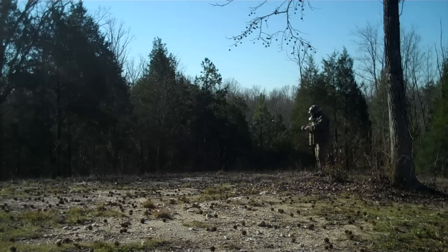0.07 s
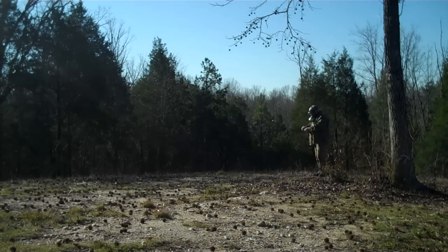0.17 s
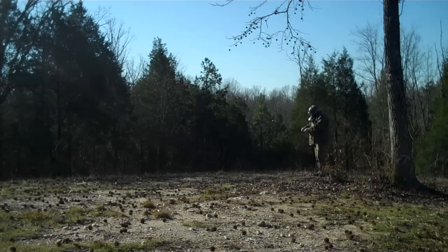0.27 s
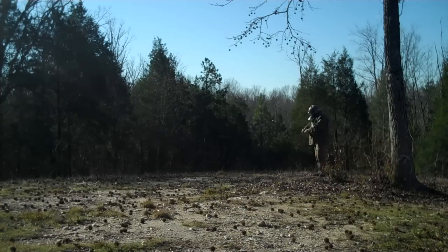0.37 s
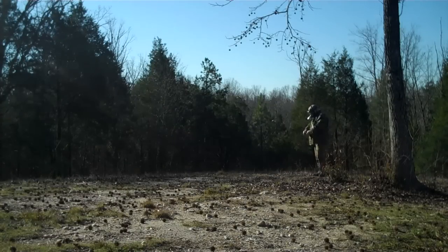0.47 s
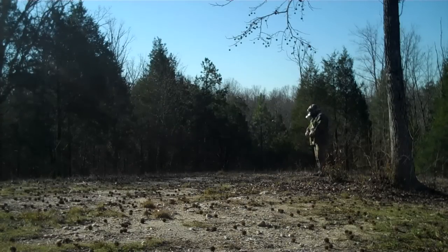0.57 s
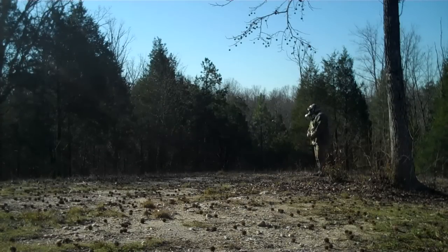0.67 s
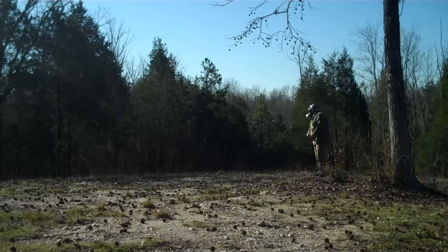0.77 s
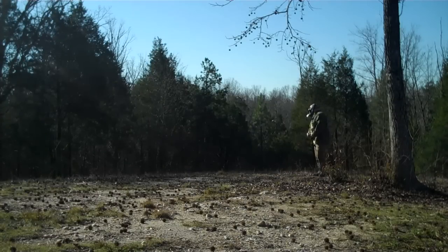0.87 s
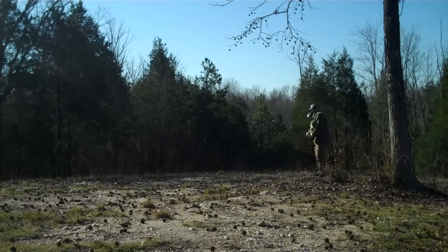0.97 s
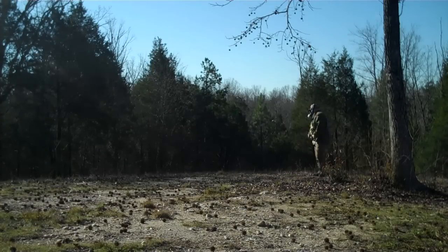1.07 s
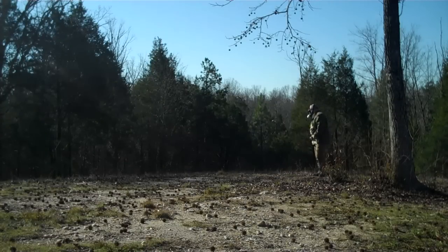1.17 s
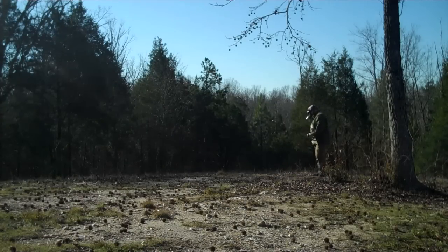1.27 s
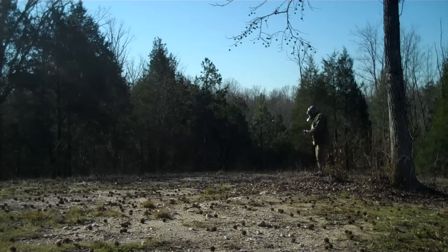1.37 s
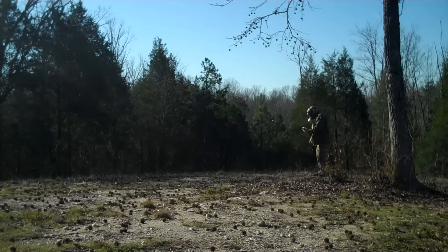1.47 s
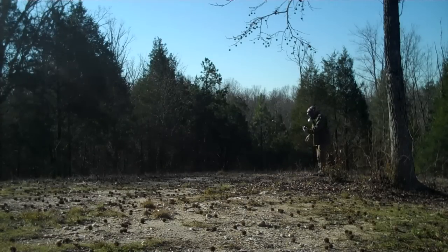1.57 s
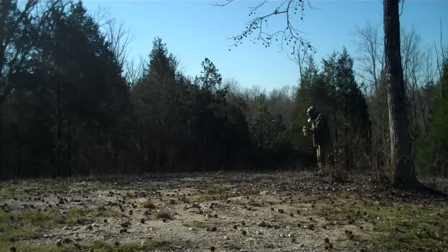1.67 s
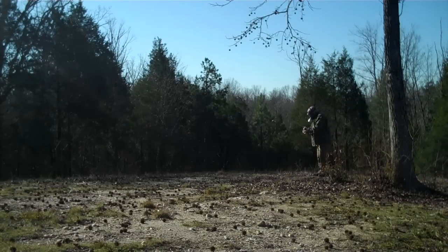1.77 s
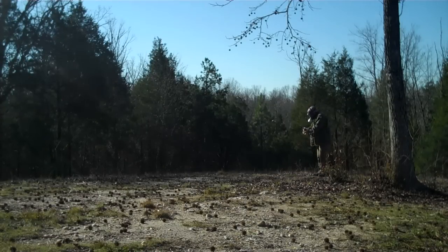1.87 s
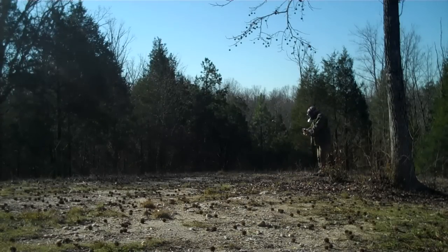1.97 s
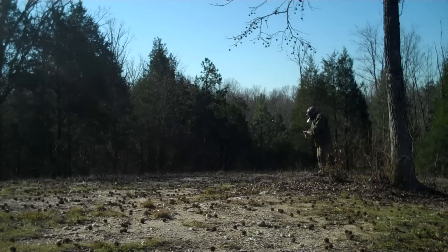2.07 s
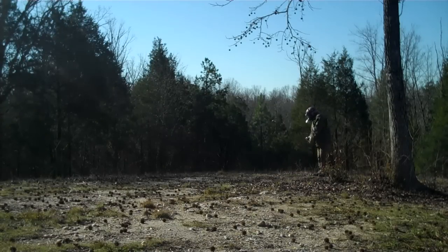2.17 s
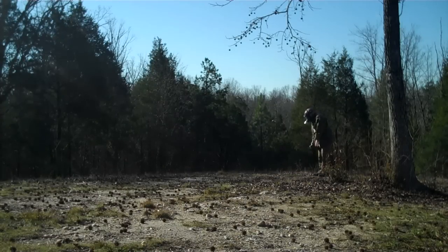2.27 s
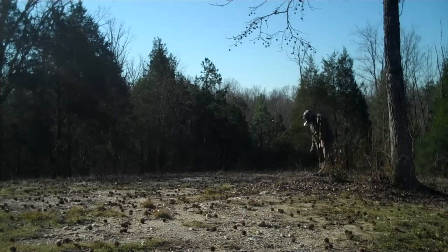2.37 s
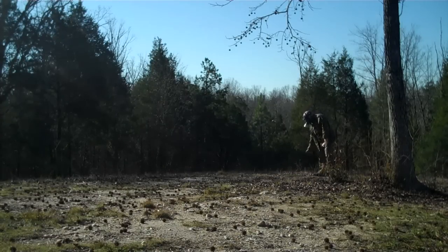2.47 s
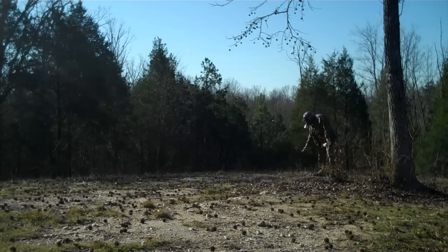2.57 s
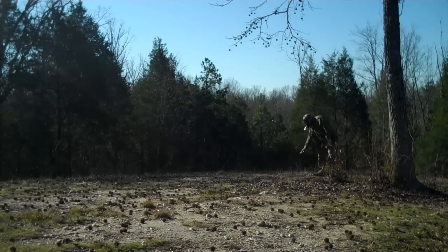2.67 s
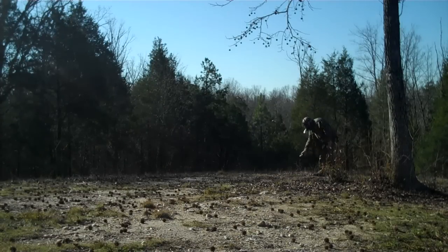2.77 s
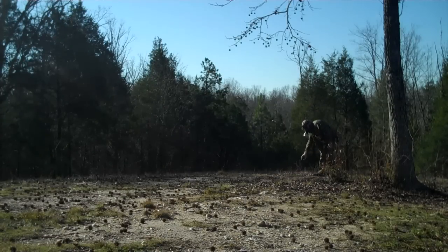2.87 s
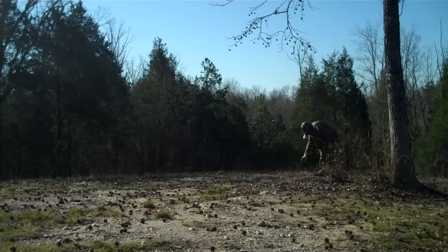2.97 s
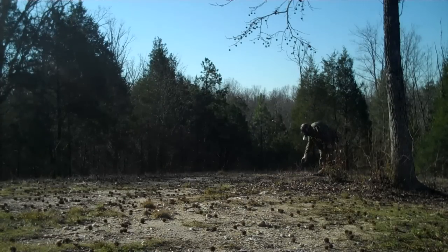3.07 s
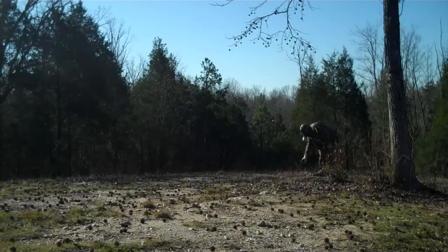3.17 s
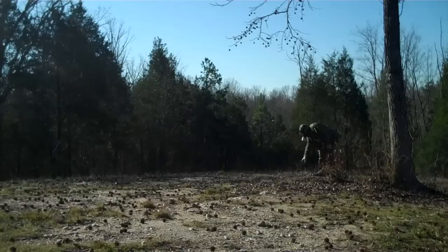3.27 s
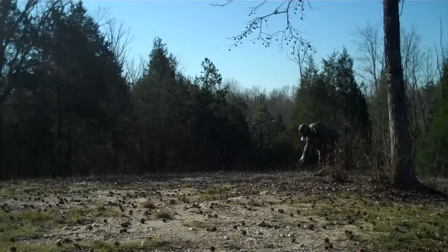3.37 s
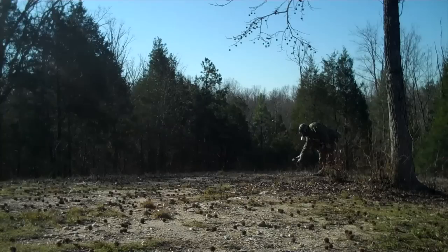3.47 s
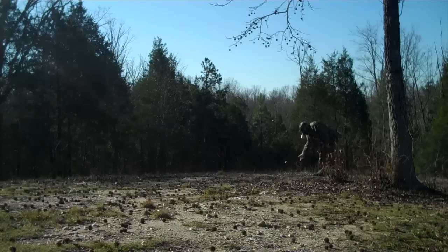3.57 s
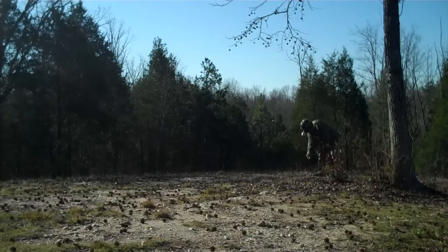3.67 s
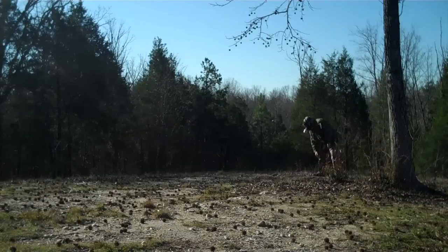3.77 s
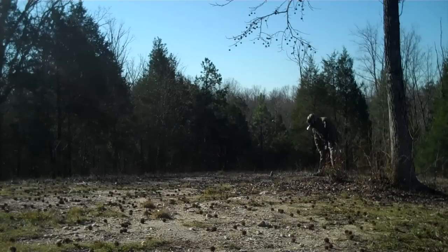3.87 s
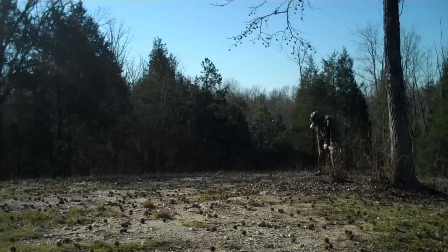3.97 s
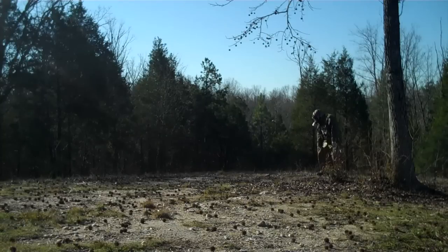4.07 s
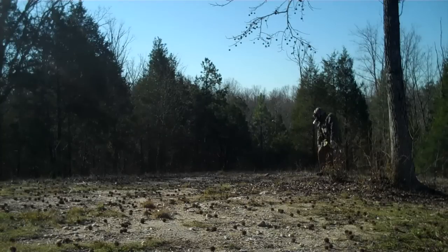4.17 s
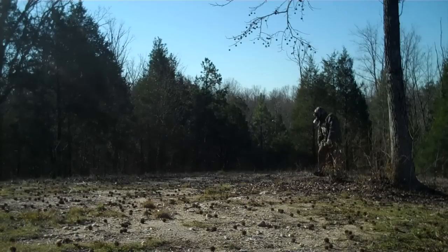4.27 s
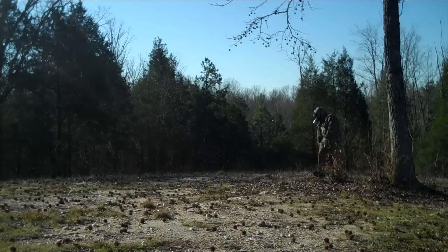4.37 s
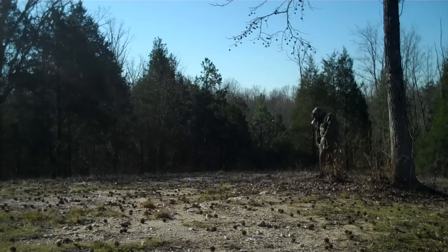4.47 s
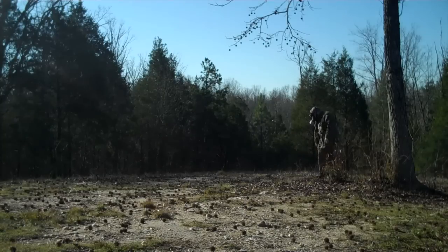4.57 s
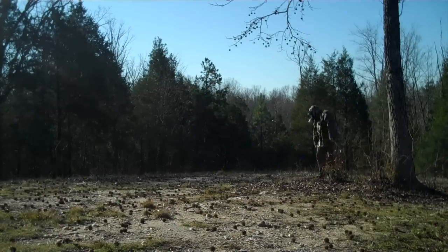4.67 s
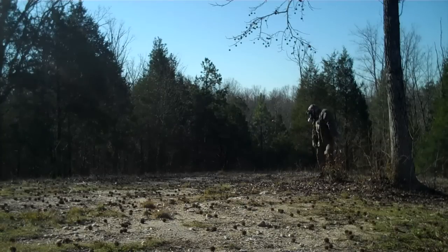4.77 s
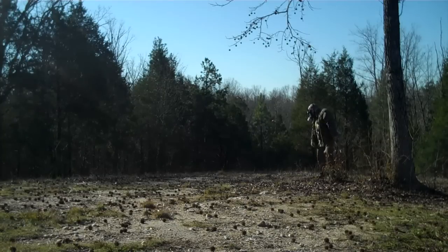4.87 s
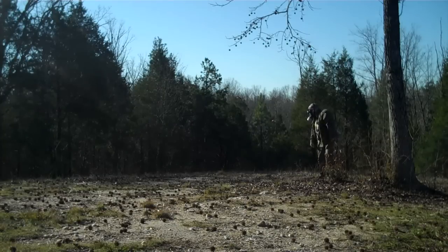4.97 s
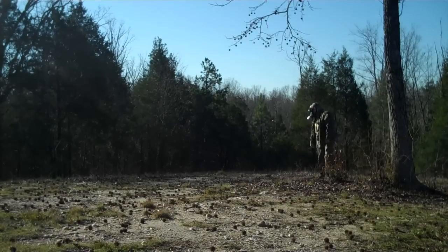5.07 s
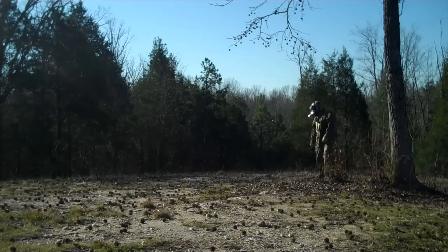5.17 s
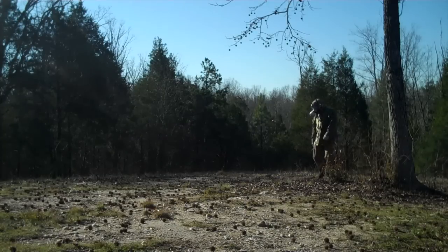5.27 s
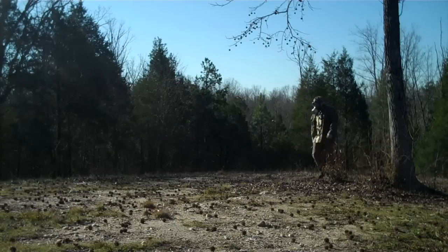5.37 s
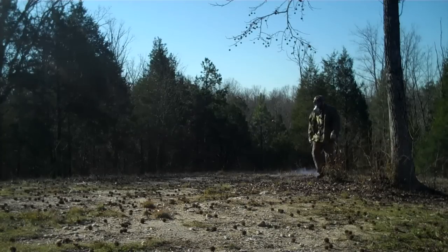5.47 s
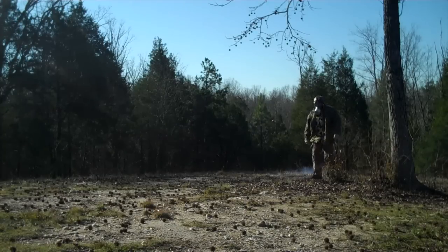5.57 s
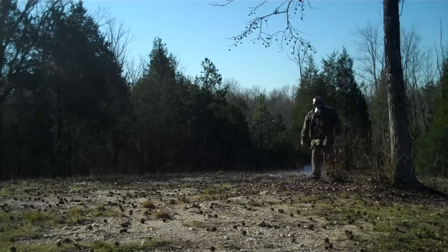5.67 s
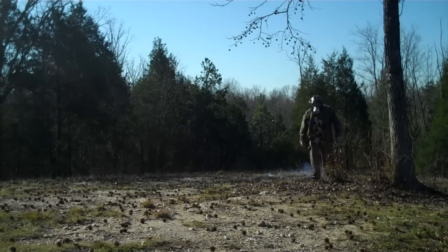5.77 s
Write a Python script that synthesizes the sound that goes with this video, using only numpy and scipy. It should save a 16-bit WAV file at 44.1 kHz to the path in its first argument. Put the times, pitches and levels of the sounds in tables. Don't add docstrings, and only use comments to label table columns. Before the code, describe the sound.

In a quiet woodland clearing, gear rustles and small metal parts click, then a fuze pops violently and echoes off the trees over hissing smoke.

```python
import sys
import numpy as np
from scipy import signal
from scipy.fft import rfft, irfft, next_fast_len
from scipy.io import wavfile
from scipy.ndimage import uniform_filter1d

SR = 44100
rng = np.random.default_rng(int(sys.argv[2]) if len(sys.argv) > 2 else 0)


def inscribe(sig):
    pcm = np.round(np.clip(np.atleast_2d(sig).T, -1, 1) * 32767)
    wavfile.write(sys.argv[1], SR, pcm.astype(np.int16))


def gain_from_db(level_db):
    decades = np.asarray(level_db, float) / 20
    return 10 ** decades


N = 256662
POP_S = 5.6043
TOP_HZ = 14300

# freq_hz, level_db (per Hz)
SCATTER_COLOUR = [(88, -47), (150, -23.5), (635, -13), (1090, -7.5), (1970, -2), (3010, -6), (4020, -7.5),
                  (4430, -7.5), (5910, -1.5), (7730, -6.5), (10500, -32.5), (14000, -40), (14900, -37)]


def unit(x):
    return x / np.sqrt(np.mean(x ** 2) + 1e-20)


def along(points, hz):
    f, v = np.transpose(points)
    return np.interp(np.log(hz + 1), np.log(f + 1), v)


def curves(rows, outside=-120):
    s, *cols = np.transpose(rows)
    return [np.interp(np.arange(N) / SR, s, c, outside, outside) for c in cols]


def filtered(x, response):
    n = x.shape[-1]
    m = next_fast_len(n + 4096)
    return irfft(rfft(x, m) * response(np.fft.rfftfreq(m, 1 / SR)), m)[..., :n]


def modes(table):
    def response(f):
        total = 0
        for k, (centre, width, db) in enumerate(table):
            total = total + (-1) ** k * gain_from_db(db) * 1j * f * width / (centre ** 2 - f * f + 1j * f * width)
        return total
    return response


def lean(points):
    return lambda f: gain_from_db(along(points, f) * np.array([[.5], [-.5]]))


def noise(spectrum, alike, size=N):
    def colour(hz):
        turn = np.arccos(np.clip(along(alike, hz), -1, 1)) / 2
        return gain_from_db(along(spectrum, hz)) * [np.cos(turn), np.sin(turn)]
    mid, side = filtered(rng.standard_normal((2, size)), colour)
    return np.array([mid + side, mid - side]) / np.sqrt(np.mean(mid ** 2) + 1e-20)


def add(track, s, sound, pan_db=0):
    part = track[:, round(s * SR):][:, :sound.shape[-1]]
    part += (sound * gain_from_db([[pan_db / 2], [-pan_db / 2]]))[:, :part.shape[1]]


def pop():
    # freq_hz, level_db (per Hz)
    blast_colour = [(180, -14), (300, -5.5), (911, -6.5), (1600, 2), (2310, -4), (2770, -20), (3530, -8),
                    (4090, -30), (7370, -11), (10200, -35), (12600, -21.5), (14900, -58)]
    # freq_hz, t60_s
    ground_decay = [(150, 0.19), (600, 0.26), (1500, 0.12), (3000, 0.091), (6500, 0.089), (12000, 0.084)]
    # pitch_hz, level_db, t60_s
    barks = [(1560, 4, .018), (1940, 0, .024)]
    close = [(300, 0.92), (2000, 0.9), (7000, 0.81), (14000, 0.29)]  # freq_hz, left-right likeness
    out, t = np.zeros((2, N)), np.arange(SR // 5) / SR

    add(out, POP_S - .0035, gain_from_db(-21 - 60 * t / 0.011) * noise(blast_colour, close, size=len(t)))

    u = t / 0.00021
    add(out, POP_S, gain_from_db(11.0) * (u * (2 - u) * np.exp(-u))[None])

    add(out, POP_S + .0004, gain_from_db(3 - 60 * t / 0.015) * noise(blast_colour, close, size=len(t)))

    hz, when, z = signal.stft(noise(SCATTER_COLOUR, close, size=len(t)), SR, nperseg=128)
    dying = z * gain_from_db(-60 * when / along(ground_decay, hz)[:, None])
    tail = signal.istft(dying, SR, nperseg=128)[1][:, :len(t)]
    add(out, POP_S + .001, gain_from_db(-5.5) * tail)

    for hz, db, t60 in barks:
        add(out, POP_S + .0001, gain_from_db(db - 60 * t / t60)[None] * np.sin(2 * np.pi * hz * t))

    thump = -t / 0.00082 * np.exp(1 - t / 0.00077)
    add(out, POP_S + .0003, gain_from_db(-.5) * thump * [[.12], [1]])
    return out


def rush():
    # time_s, low_db, high_db
    wash_levels = [
        (5.664, -25, -28.5),
        (5.704, -22.5, -28),
        (5.714, -25, -29),
        (5.746, -21.5, -28.5),
        (5.82, -26.5, -34.5),
    ]
    # freq_hz, level_db (per Hz)
    wash_colour = [(24, -65), (40, -35), (71, -48), (113, -25), (232, -11), (345, -14.5), (400, -8.5),
                   (560, -7.5), (820, -12), (2210, -4), (3050, -8), (3600, -13), (7430, -11.5),
                   (10800, -38), (13800, -39), (14900, -79)]
    # freq_hz, left-right likeness
    wash_alike = [(60, 0.3), (130, 0.96), (290, 0.99), (630, 0.96), (1380, 0.7), (3010, 0.27),
                  (6590, -0.28), (14400, -0.24)]
    # time_s, peak_db, left_right_db
    trunk_echoes = [(5.662, -16, 2), (5.666, -16, 1), (5.678, -13, 0), (5.683, -13, 4), (5.69, -18, 2),
                    (5.699, -12.5, 2), (5.703, -15, 2), (5.708, -14, 3), (5.713, -18, 0), (5.723, -13, -2),
                    (5.733, -16, 1.5), (5.746, -13, 3), (5.751, -15, 0), (5.757, -16, 0), (5.768, -19, 0),
                    (5.775, -18, 0), (5.783, -15.5, -2), (5.796, -20, 0), (5.81, -20, 0)]
    first_echo_s = 5.6622
    onset = [(first_echo_s, -60, -60), (first_echo_s + 0.00086, *wash_levels[0][1:])]
    hold = [(wash_levels[-1][0] + .1, *wash_levels[-1][1:])]
    low_db, high_db = curves(onset + list(wash_levels) + hold)
    wash = noise(wash_colour, wash_alike)
    low = filtered(wash, lambda f: 1 / (1 + (f / 3500) ** 4))

    trunks, t = np.zeros((2, N)), np.arange(SR // 20) / SR
    for s, db, pan in trunk_echoes:
        add(trunks, s, gain_from_db(db + 15 - 60 * t / 0.022)[None] * (1 - np.exp(-t / 0.00078)), pan)
    sound = (0.7 + .6 * trunks) * (gain_from_db(low_db) * unit(low) + gain_from_db(high_db) * unit(wash - low))

    middle = filtered(wash, lambda f: abs(modes([(1800, 2200, 0)])(f)) ** 2)
    sound = sound + trunks * gain_from_db(low_db - 3) * unit(middle)

    top = filtered(sound, lambda f: 1 / (1 + (9500 / (f + 1)) ** 12))
    sound = sound - top * np.clip((np.arange(N) / SR - first_echo_s) / .2, 0, 1)

    t = t[:256]
    slap = gain_from_db(-11.5 - 60 * t / 0.005) * (1 - np.exp(-t / 0.00027))
    add(sound, first_echo_s, slap * noise(SCATTER_COLOUR, [(1000, .9)], size=256))
    return sound


def clicks():
    # freq_hz, width_hz, level_db
    port = [(4330, 1100, -12.5), (5790, 890, 0.5), (7330, 1400, -2.5), (11500, 4900, -18)]
    # time_s, peak_db, body_hz, body_db, t60_s
    snaps = [(1.1055, -28, 3300, -8, 0.022), (1.1107, -28, 3570, -9, 0.017),
             (1.7548, -32, 3200, -5.5, 0.0087), (1.7572, -21, 2800, -10, 0.0058),
             (2.4534, -61, 1470, 6, 0.01), (2.7507, -25.5, 3850, -35, 0.01),
             (2.7883, -32.5, 1460, -29, 0.0087), (3.5912, -32.5, 3700, -9, 0.014),
             (3.6099, -26, 3470, -14, 0.031), (3.616, -16, 3850, -14, 0.0066),
             (3.6186, -12, 3450, -18, 0.0076), (3.773, -40.5, 3800, 1, 0.01),
             (3.8886, -26, 1290, -22, 0.0087), (3.89, -16.5, 4140, -42, 0.012),
             (4.464, -47.5, 2540, 9.5, 0.01), (4.5145, -33, 3630, 1, 0.013), (4.62, -52, 2200, 6, .015),
             (4.633, -51, 2320, 2, 0.01), (4.641, -53, 2200, 6, .01), (4.676, -52, 2200, 6.5, .012)]
    # time_s, peak_db
    small_ticks = [(1.858, -45.5), (2.712, -39.5), (2.721, -42), (2.7258, -40), (2.7383, -42),
                   (2.7484, -41), (2.7858, -40), (2.7986, -44), (2.8163, -46), (2.9266, -54), (2.947, -50),
                   (2.9614, -47), (3.0084, -50), (3.8087, -42), (3.8617, -35), (3.873, -38), (3.9687, -40),
                   (4.0775, -45), (4.1573, -46), (4.203, -42.5), (4.5837, -45), (4.6099, -50),
                   (5.0728, -42), (5.1355, -42), (5.1735, -48), (5.1997, -53), (5.577, -34)]
    tick_hz, tick_spread, tick_body_db, tick_t60_s = 3210, 0.294, -14.5, 0.015
    out, t = np.zeros((2, N)), np.arange(2048) / SR
    ticks = [(s, db, tick_hz * np.exp(tick_spread * rng.normal()), tick_body_db, tick_t60_s)
             for s, db in small_ticks]
    for s, db, hz, body_db, t60 in list(snaps) + ticks:
        draw = rng.standard_normal((3, len(t)))
        rattle = draw[0] + 0.35 * draw[1:]
        rattle = rattle * (gain_from_db(-60 * t / 0.0017) + 0.49 * gain_from_db(-60 * t / t60))
        rattle[:, 0] = 2.3
        bright = filtered(rattle, lambda f: modes(port)(f) ** 2)
        body = filtered(rattle, lambda f: modes([(hz, .23 * hz, 0)])(f) ** 2)
        broad = filtered(draw[1:] * gain_from_db(-60 * t / 0.0053), lambda f: modes([(6200, 6000, 0)])(f) ** 3)
        click = bright / abs(bright).max()
        click = click + gain_from_db(-9.0) * broad / abs(broad).max()
        click = click + gain_from_db(body_db) * body / abs(body).max()
        add(out, s - .0004, gain_from_db(db) * click)
    return out


def rings():
    # pitch_hz, level_db, t60_s
    pull_ring = [(3500, -10, 0.048), (3820, -4, .025), (5580, 1, .034), (6320, 8, 0.03), (6630, -13, .04),
                 (7160, -14, .06)]
    # pitch_hz, level_db, t60_s
    lever = [(3560, -7, .09), (5066, -10, .09), (5276, -2, .1), (5303, -2, .16), (5652, -12, .1),
             (5970, -5, .15), (5787, -20, .3), (6352, -17, .08), (8032, -8, .1), (9825, -12, .06),
             (11500, -22, .04), (13850, -15, .06)]
    # pitch_hz, level_db, t60_s
    fuze_body = [(682, -6, 0.042), (954, 1.5, .05), (1330, 5, 0.039), (1606, 4, 0.046), (1956, -15, 0.057),
                 (3890, -7.5, 0.098), (5660, -1, 0.085), (7200, 4, 0.058)]
    # start_s, pitch_hz,
    # level_db, t60_s
    single_notes = [(1.0, 410, -62, 1), (1.105, 500, -53.5, 0.18), (3.616, 575, -49, 0.46),
                    (3.89, 564, -58, 0.42), (1.168, 3450, -59, .12), (1.19, 3630, -63, .1),
                    (1.205, 3380, -65, .12), (1.26, 3410, -66, .1), (3.616, 710, -35, 0.014),
                    (1.757, 2050, -39, 0.019), (3.62, 410, -62, 0.42), (3.895, 478, -52.5, 0.5),
                    (3.894, 188, -45, 0.041), (1.111, 2200, -45, .008), (4.205, 7500, -52, .05),
                    (5.1, 6150, -54, .04), (1.486, 600, -54, 0.019), (1.503, 870, -48, .03),
                    (1.508, 440, -49, .03), (4.464, 1500, -35, 0.0056), (4.513, 1200, -49, 0.017),
                    (4.605, 685, -54, 0.074), (5.566, 1040, -47, .01), (5.577, 880, -44, 0.033),
                    (5.589, 6250, -43, 0.031)]
    # start_s,
    # pitch_hz, level_db, t60_s
    pings = [(1.1048, 3670, -21, .008), (1.105, 4770, -27, .008), (1.1103, 3700, -26, .01),
             (1.1105, 5720, -29, .02), (1.1105, 6300, -25, .015), (1.169, 5900, -54, .015),
             (1.174, 7300, -52, .015), (1.205, 720, -64, .25), (1.27, 760, -64, .25),
             (1.7567, 6200, -10, .0055), (3.591, 5750, -35, .02), (3.6156, 5600, -7, .005),
             (3.6156, 4540, -22, .006), (3.6184, 5600, -7, .007), (3.6184, 4500, -23, .008),
             (3.6184, 7200, -24, .006), (3.66, 5300, -40, .12), (3.6265, 5975, -31, .07),
             (3.682, 5950, -50, .08), (3.705, 5650, -52, .1), (3.733, 5700, -53, .1),
             (3.889, 5600, -24, .035), (3.889, 6300, -24, .01), (3.889, 7350, -27, .03),
             (3.903, 510, -52, .06), (3.955, 5800, -47, .05), (4.027, 6000, -48, .03),
             (4.055, 7600, -53, .03)]
    out, t = np.zeros((2, N)), np.arange(SR // 2) / SR

    def strike(s, ring_db, part):
        for hz, level_db, t60 in part:
            phase = rng.uniform(0, 2 * np.pi) + rng.normal(0, 0.53, (2, 1))
            jangle_db = 1.8 * np.interp(t * 150, np.arange(80), rng.standard_normal(80))
            envelope = gain_from_db(ring_db + level_db + jangle_db - 60 * t / t60) * (1 - np.exp(-t / 0.00037))
            add(out, s, envelope * np.sin(2 * np.pi * hz * t + phase))

    strike(1.111, -40.5, pull_ring)
    strike(3.617, -28, lever)
    strike(3.89, -51, lever)
    strike(5.606, -13, fuze_body)
    for s, hz, db, t60 in single_notes:
        add(out, s, gain_from_db(db - 60 * t / t60) * np.sin(2 * np.pi * hz * t)[None])
    for s, hz, db, t60 in pings:
        rise = (1 - np.exp(-t * hz / 1.3)) ** 2
        add(out, s, gain_from_db(db - 60 * t / t60)[None] * rise * np.sin(2 * np.pi * hz * t))
    return out


def scrape():
    # start_s, length_s, level_db
    strokes = [
        (1.165, .06, -70),
        (1.2, .1, -74),
        (1.28, .03, -77),
    ]
    # freq_hz, level_db (per Hz)
    drag_colour = [(2500, -40), (3050, -8), (3450, 0), (3800, -6), (4300, -40)]
    t = np.arange(N) / SR
    stroke = np.zeros(N)
    for s, length, db in strokes:
        stroke += gain_from_db(db) * np.clip(np.minimum(t - s, s + length - t) / .008, 0, 1)
    knots = np.arange(N // 120 + 2)
    grit = gain_from_db(4 * np.interp(np.arange(N) / 120, knots, rng.standard_normal(len(knots))))
    return stroke * unit(grit) * noise(drag_colour, [(3000, .8)])


def rustle():
    # peak_s, gear_db, leaves_db, rise_s, fall_s
    moves = [(1.125, -61, -68, .005, 0.065), (1.175, -60.5, -61.5, .03, 0.17),
             (1.505, -67, -63.5, .06, 0.079), (2.3, -71.5, -73, 0.17, .4), (2.46, -67, -62, .05, 0.035),
             (2.746, -47.5, -64, 0.052, .025), (2.786, -54, -72, .006, 0.13), (3.01, -62, -69, 0.3, 0.19),
             (3.622, -44, -60, .004, 0.039), (3.51, -62.5, -75, .1, 0.096), (3.585, -59, -62, 0.085, 0.057),
             (3.69, -61, -63.5, .1, 0.17), (3.812, -53, -60, .012, .08), (3.865, -47, -54.5, .2, 0.15),
             (3.892, -40.5, -50, .012, 0.051), (3.958, -53.5, -63.5, .06, 0.39), (4.3, -64, -72, .9, 1),
             (4.466, -55, -58, 0.016, 0.068), (4.516, -48, -56, 0.091, 0.038), (4.604, -53, -56, 0.1, 0.24),
             (4.8, -64.5, -71, .4, 0.69), (5.085, -59, -64, 0.083, .25),
             (5.194, -52.5, -59.5, 0.057, 0.086), (5.3, -64, -69.5, 0.71, 0.56),
             (5.582, -55, -63, 0.032, .1)]
    # freq_hz, level_db (per Hz)
    gear_colour = [(2500, -30), (3600, -15.5), (4800, -10), (5900, -1), (6650, -5.5), (7400, -3),
                   (8500, -17), (9700, -27), (14000, -36)]
    # freq_hz, level_db (per Hz)
    leaves_colour = [(200, -25), (500, 0), (1000, -1.5), (1600, -3.5), (2150, 1), (3200, -1.5), (4500, -11),
                     (6000, -32)]
    swell_db = 20
    t, level_db = np.arange(N) / SR, np.full((2, N), -120.)
    for s, gear_db, leaves_db, rise, fall in moves:
        slope_db = swell_db * np.where(t < s, (s - t) / rise, (t - s) / fall)
        level_db = np.maximum(level_db, np.array([[gear_db], [leaves_db]]) - slope_db)
    gear, leaves = uniform_filter1d(gain_from_db(level_db), size=300)

    clumps = []
    for knots in rng.standard_normal((2, N // 100 + 2)):
        fast = np.interp(np.arange(N) / 100, np.arange(len(knots)), knots)
        slow = np.interp(np.arange(N) / 700, np.arange(len(knots)), knots[::-1])
        clumps.append(unit(gain_from_db(3.16 * fast + 2.0 * slow)))
    gear_clumps, leaf_clumps = clumps

    alike = [(600, 1.0), (7000, 0.75), (14000, .2)]  # freq_hz, left-right likeness
    kit = noise(gear_colour, alike)
    lower_band = filtered(kit, lambda f: 1 / (1 + (f / 6600) ** 16))
    kit = gear_clumps * lower_band + gear_clumps[::-1] * (kit - lower_band)
    return gear * kit + leaves * leaf_clumps * noise(leaves_colour, alike)


def woods(x):
    t = np.arange(SR // 3) / SR
    echo = rng.standard_normal((2, len(t))) * gain_from_db(-60 * t / 0.55) * np.clip((t - .058) / 0.032, 0, 1)
    near = rng.standard_normal((2, len(t))) * gain_from_db(-60 * t / 0.042)
    return signal.fftconvolve(x, gain_from_db(-46.5) * echo + gain_from_db(-36) * near, axes=1)[:, :N]


def bird():
    # start_s, length_s, first_hz, last_hz, level_db
    whistles = [(.262, .035, 7050, 7400, -77), (.468, .032, 8300, 7700, -69), (.5, .014, 7800, 8350, -73),
                (.514, .022, 8350, 7850, -71), (0.541, .035, 8050, 7450, -68),
                (.575, .045, 7550, 7450, -77), (.63, 0.043, 8400, 7840, -72),
                (0.677, .055, 7850, 7600, -70), (.735, .06, 7750, 7650, -77),
                (.813, .02, 6000, 7730, -56.5), (0.824, .012, 6200, 7200, -64),
                (2.915, .015, 8200, 8400, -73), (2.993, 0.03, 7000, 7750, -66)]
    edge_s, glide_bend = 0.0031, 0.635
    out, t = np.zeros(N), np.arange(N) / SR
    waver = 2 * np.pi * 38 * t
    for s, length, first_hz, last_hz, db in whistles:
        glide = np.clip((t - s) / length, 0, 1) ** glide_bend
        hz = (first_hz + (last_hz - first_hz) * glide) * (1 + 0.015 * np.sin(waver))
        gate = np.clip(np.minimum(t - s, s + length - t) / edge_s, 0, 1)
        level = gain_from_db(db + 2.7 * np.sin(waver + 1.6))
        out += gate * level * np.sin(2 * np.pi * np.cumsum(hz) / SR)
    t = t[:SR // 8]
    blur = rng.standard_normal((2, len(t))) * gain_from_db(-60 * t / 0.24)
    return gain_from_db(2.5) * out + gain_from_db(-28) * signal.fftconvolve(out[None], blur, axes=1)[:, :N]


def air():
    # freq_hz, level_db (per Hz)
    air_colour = [(15, -38), (25, 3), (59, -1.5), (135, -2.5), (212, -6), (242, -6), (317, -7), (499, -9),
                  (688, -10.5), (829, -11), (2000, -14.5), (2690, -15.5), (13700, -24), (14900, -46)]
    # freq_hz, left-right likeness
    air_alike = [(60, 0.44), (130, 0.83), (290, 0.48), (630, 0.22), (1380, 0.042), (3010, -0.048),
                 (6590, 0.14), (14400, -0.27)]
    # freq_hz, left_right_db
    air_lean = [(60, -2), (240, 3), (930, 5.5), (3660, 0.5), (14400, 0.5)]
    # time_s, level_db
    drone_levels = [(0.0, -65), (0.32, -62), (1.1, -75), (2.56, -66.5), (3.25, -84), (3.86, -64.5),
                    (4.27, -70.5), (5.41, -71), (5.5, -63)]
    drone = noise([(200, -50), (211, -25), (215.5, -8), (220, -24), (232, -51)], [(200, 0.79)])
    still = filtered(noise(air_colour, air_alike), lambda f: lean(air_lean)(f) * (f < TOP_HZ))
    return gain_from_db(-61) * still + gain_from_db(curves(drone_levels)[0] - 5.5) * drone


def scene():
    # freq_hz, left_right_db
    port_lean = [(300, -2), (2300, 1), (4260, -6.5), (7840, 7), (14400, 15.5)]
    lag_s = 1 / SR
    handling = clicks() + rings()
    near = handling + woods(handling) + rustle() + pop()
    near = filtered(near, lambda f: np.exp(-1j * np.pi * f * lag_s * np.array([[1], [-1]])))
    return filtered(near + rush(), lean(port_lean)) + bird() + air() + scrape()


def band_limit(x):
    return signal.sosfilt(signal.butter(12, 15020, fs=SR, output="sos"), x)


def record(dry):
    limited = np.clip(filtered(dry, lambda f: 1j * f / (30 + 1j * f)), -1.1, 1.1)
    t = np.arange(SR // 2) / SR
    sag = .013 * np.exp(-t / .3) - .045 * np.exp(-t / .045)
    add(limited, POP_S, sag * (1 - np.exp(-t / .006)) * [[0], [1]])

    def dull(f):
        treble = gain_from_db(-17 * np.clip((f - TOP_HZ) / 400, 0, 1))
        return treble * (1j * f / (36 + 1j * f)) ** 2
    mix = np.clip(filtered(limited, dull), -1, 1)
    return band_limit(mix)


dry = scene()
out = record(dry)
inscribe(out)
```